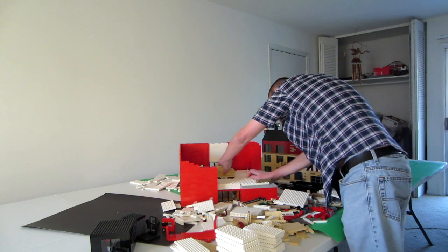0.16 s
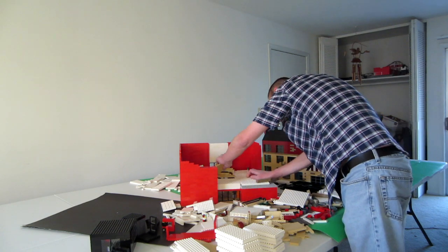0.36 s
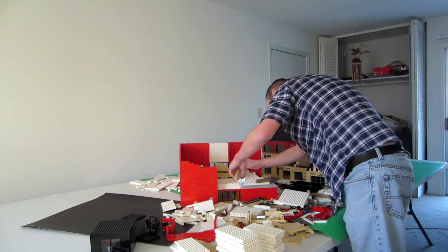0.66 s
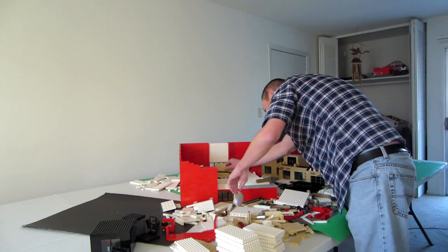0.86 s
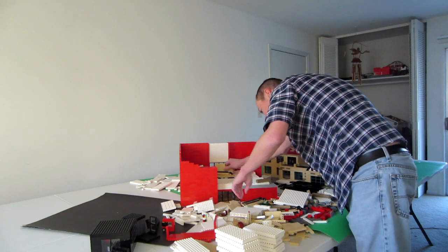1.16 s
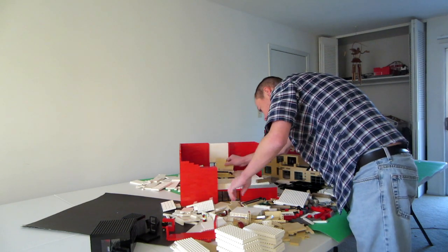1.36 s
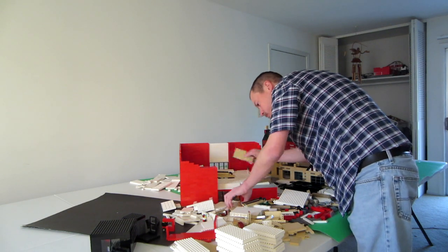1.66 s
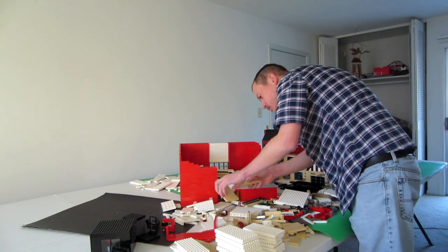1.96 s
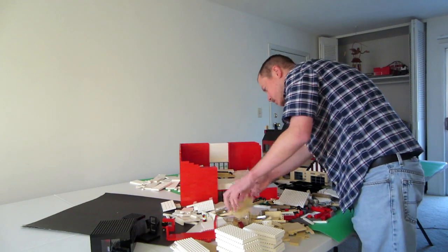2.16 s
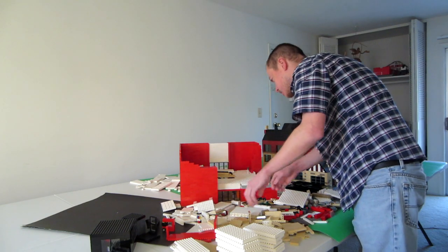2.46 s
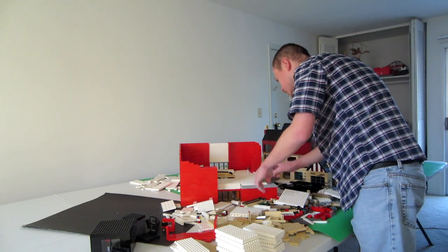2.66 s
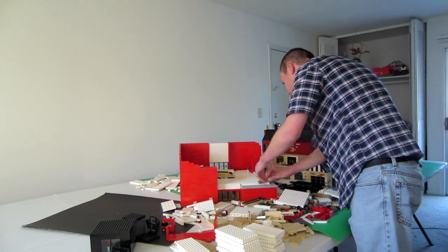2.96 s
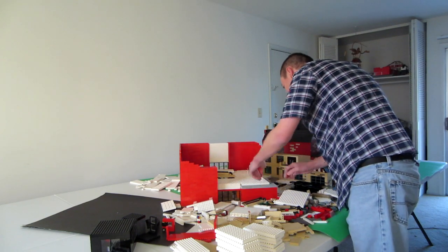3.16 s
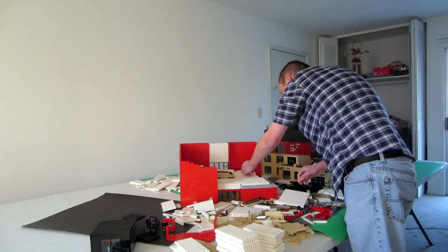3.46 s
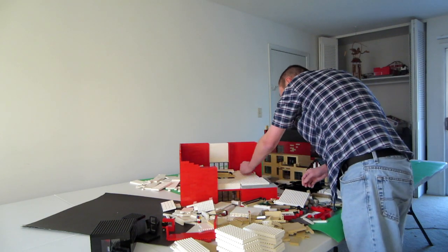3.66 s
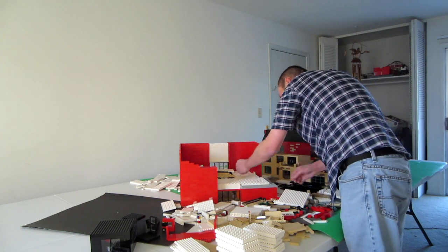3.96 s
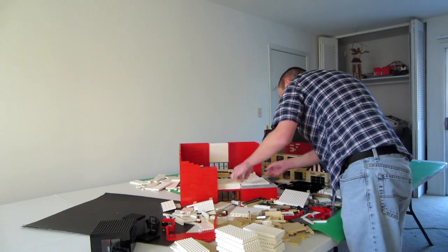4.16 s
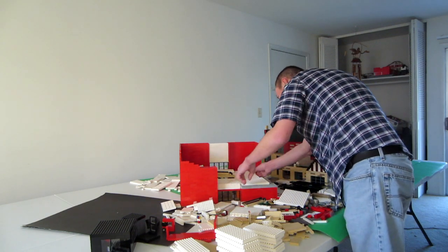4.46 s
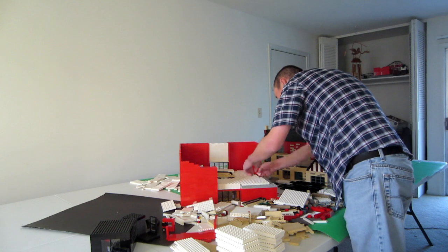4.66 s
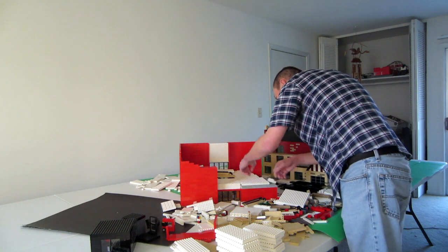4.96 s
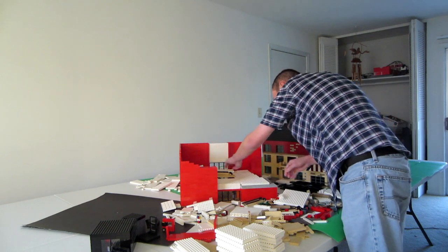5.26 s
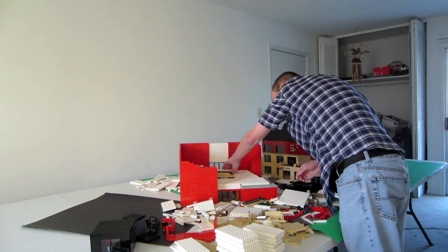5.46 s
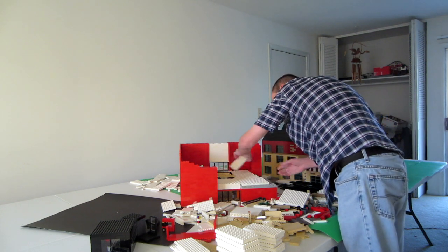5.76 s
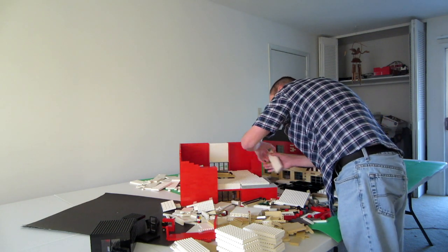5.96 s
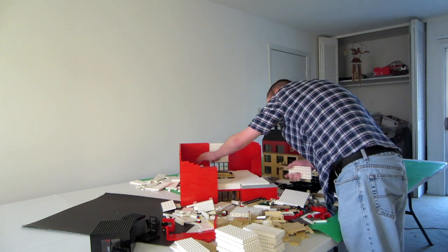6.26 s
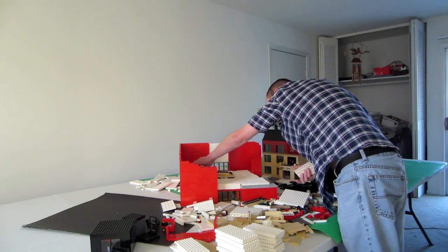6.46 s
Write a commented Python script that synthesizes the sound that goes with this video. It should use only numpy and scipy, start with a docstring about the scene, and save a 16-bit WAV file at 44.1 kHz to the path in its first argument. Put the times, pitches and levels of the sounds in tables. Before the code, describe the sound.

Irregular plastic clatter of toy bricks being pried off and dropped on loose piles, a short tumbling cascade, and soft room hush beneath.

```python
"""Under a steady room hush, plastic toy bricks are pried off a model and dropped on heaps of bricks on a table.
Each contact chatters into damped modes, coloured by table resonances; decaying sines thump the table top. Then
loose bricks slide (scattered tiny touches), freed pieces ring (clusters of close sines) and a section tumbles
down a heap (uneven knocks); later a wide plate is knocked and rings in fixed modes, with further clusters of
close sines near its pitches. The bare room answers the contacts, slide, rings and plate with near reflections
and a diffuse tail."""
import sys
import numpy as np
from scipy import signal
from scipy.fft import rfft, irfft
from scipy.io import wavfile

SR = 44100
rng = np.random.default_rng(int(sys.argv[2]) if len(sys.argv) > 2 else 0)


def unload_wav(signal):
    """Save mono or channel-first audio to the path in sys.argv[1] as 16-bit WAV at rate SR, clipped to [-1, 1]."""
    wavfile.write(
        sys.argv[1],
        SR,
        np.round(np.clip(np.atleast_2d(signal).T, -1, 1) * 32767).astype(np.int16),
    )


N = 291501
BLOW_S = .01   # blow levels state the rms if all energy fell within this time
CUTOFF_HZ = 16000
# band edges for room decay and blow colour: edge_hz
EDGES_HZ = np.r_[40, 60, 85, np.geomspace(113, 3620, 12),
            4700, 6200, 8000, 9500, 10900, 12400, 14200, 16500]
CENTRES_HZ = np.sqrt(EDGES_HZ[:-1] * EDGES_HZ[1:])
BANK = [signal.butter(3, pair, "band", fs=SR, output="sos") for pair in zip(EDGES_HZ, EDGES_HZ[1:])]
AGE = np.arange(SR // 2) / SR   # s since a blow


def from_db(db):
    """Decibels to amplitude gain."""
    return 10 ** (np.asarray(db) / 20)


def unit(x):
    """Scale to an energy of one."""
    return x / np.sqrt(np.sum(x ** 2, axis=-1, keepdims=True) + 1e-20)


def at_hz(points, hz, axis=1):
    """Interpolate a table column on a log-frequency axis."""
    points = np.array(points)
    return np.interp(np.log(hz), np.log(points[:, 0]), points[:, axis])


def fade(t60_s):
    """Exponential decay after a blow: 60 dB per t60."""
    return from_db(-60 * np.minimum(AGE / max(t60_s, 1e-3), 4))


def add(out, start_s, sound):
    """Mix a sound in at start_s."""
    start = round(start_s * SR)
    out[start:start + len(sound)] += sound[:N - start]


def hush():
    """Steady room air: Gaussian noise shaped in frequency, strongest in the bass."""
    # noise spectrum: frequency_hz, relative_density_db_per_hz
    spectrum_points = [(12, -36), (20, 0), (77, -9.5), (104, -11.5), (187, -12.5), (210, -12.5), (642, -16),
                       (698, -18.5), (897, -14.5), (1030, -18.5), (6720, -38.5), (11400, -49.5),
                       (12800, -56), (16000, -49)]
    rms_db = -53.5
    hz = np.maximum(np.arange(N // 2 + 1) * SR / N, 1)
    white = rfft(rng.standard_normal(N))
    noise = irfft(white * from_db(at_hz(spectrum_points, hz)), N)
    return from_db(rms_db) * unit(noise) * np.sqrt(N)


def echo_path(early_t60_s=0.079, early_db=7, reflections_per_s=4000, gap_s=0.0037, build_s=0.012):
    """Table spot to microphone: direct sound with sparse near reflections, and a tail decaying per band."""
    # room: frequency_hz, t60_s, relative_echo_db
    room = [(130, 0.47, -1.5), (394, 0.42, 1), (1460, 0.4, 2), (4970, 0.39, -3.5), (13000, 0.28, -5)]
    arrives = rng.random(len(AGE)) < reflections_per_s / SR * (1 - np.exp(-AGE / gap_s))
    reflections = rng.standard_normal(len(AGE)) * arrives * fade(early_t60_s)
    near = from_db(early_db) * unit(reflections)
    near[0] += 1   # direct sound
    build_up = 1 - np.exp(-AGE / build_s)
    tail = 0
    for sos, hz, width_hz in zip(BANK, CENTRES_HZ, np.diff(EDGES_HZ)):
        band = signal.sosfilt(sos, rng.standard_normal(len(AGE)))
        dying = band * fade(at_hz(room, hz)) * build_up
        tail = tail + unit(dying) * np.sqrt(2 * width_hz / SR) * from_db(at_hz(room, hz, axis=2))
    return unit(near), tail


def chatter(count=4, span_s=.012, bounce_db=-12, size=2000):
    """A first touch, then weaker random touches of corners and studs."""
    touches = np.zeros(size)
    at = np.clip(rng.random(count) * span_s * SR, 1, size - 1).astype(int)
    touches[at] = from_db(bounce_db) * rng.standard_normal(count)
    touches[0] = 1
    return touches


def piece(count=32, t60_at_2khz_s=0.014, crack_db=-2, size=2000):
    """Impulse response of a brick assembly: a crack plus damped modes, the higher dying sooner."""
    hz = np.exp(rng.uniform(np.log(600), np.log(10000), (count, 1)))
    t60_s = t60_at_2khz_s * (2000 / hz) ** .5
    modes = unit(np.sin(2 * np.pi * hz * AGE[:size]) * from_db(-60 * AGE[:size] / t60_s))
    strengths = np.sqrt(hz) * rng.standard_normal((count, 1))
    sound = unit(np.sum(modes * strengths, axis=0))
    sound[0] += from_db(crack_db)
    return sound


def voiced(blow, octave_db, size=32768):
    """Set a blow's levels per octave with a minimum-phase filter, keeping its attack sharp."""
    spectrum = rfft(blow, size)
    hz = np.maximum(np.arange(size // 2 + 1) * SR / size, 1)
    band_power = np.array([np.mean(np.abs(spectrum[(hz >= low) & (hz < high)]) ** 2)
                           for low, high in zip(EDGES_HZ, EDGES_HZ[1:])])
    # per octave to per Hz
    voiced_power = from_db(octave_db) ** 2 * BLOW_S * SR ** 2 / (2 * np.log(2) * CENTRES_HZ)
    log_gain = .5 * np.log(voiced_power / band_power)
    cepstrum = irfft(np.interp(np.log(hz), np.log(CENTRES_HZ), log_gain), size)
    cepstrum[1:size // 2] *= 2   # folded forward in time: the filter is causal
    minimum_phase = np.exp(rfft(cepstrum[:size // 2], size))
    return irfft(spectrum * minimum_phase, size)[:len(AGE)]


def heard(sound, path, size=8192):
    """The near field keeps a piece's fine modes; the tail gathers it from all sides, so is smooth."""
    near, tail = path
    reflected = signal.fftconvolve(sound, near[:size // 2])
    close = voiced(reflected, 10 * np.log10(CENTRES_HZ), size=size)   # equal energy per Hz
    return np.pad(unit(close), (0, len(AGE) - size)) + tail


def blow_colour(strength_db, weight_db, hardness_db):
    """Levels per octave: weight sets the thud, hardness the tick, their balance knock against clack."""
    # zones of thud, knock, clack, tick: centre_hz
    zones_hz = [200, 650, 2100, 6000]
    # span of the top lift: start_hz, full_hz
    sharp_hz = [6000, 9500]
    # colour common to all contacts: frequency_hz, relative_level_db_per_octave
    common_colour = [(45, -37), (95, -27.5), (135, -5.5), (180, -4.5), (300, -1), (600, -2), (1200, 0),
                     (3000, 0.5), (4100, -1.5), (7000, 0), (8900, 1.5), (11600, -26), (13300, -21.5),
                     (15400, -29)]
    knock_db, knock_db_per_db = 0.2, 0.18
    sharp_db, sharp_db_per_db = 0.94, .07
    lean_db = knock_db + knock_db_per_db * (weight_db - hardness_db)
    levels_db = [weight_db, lean_db, -lean_db, hardness_db]
    zones_db = np.interp(np.log(CENTRES_HZ), np.log(zones_hz), levels_db)
    # a corner hits more briefly than a flat face
    top_db = np.interp(CENTRES_HZ, sharp_hz, [0, sharp_db + sharp_db_per_db * hardness_db])
    return strength_db + zones_db + top_db + at_hz(common_colour, CENTRES_HZ)


def contacts(paths):
    """Each contact, tumbling knocks included, chatters into a piece coloured by its manner."""
    # blows on table and heaps: start_s, relative_strength_db, weight_db (bass), hardness_db (treble)
    blows = [(.077, -41.5, -3, 1.5), (.121, -30, -2, -17.5), (.179, -17, -5.5, -13), (.547, -54, 11, -28),
             (.617, -44.5, 0.5, -12), (.772, -37, 2.5, -8.5), (.804, -40.5, 2, -22), (.8732, -15, 10, -14),
             (.971, -26.5, 10.5, -9.5), (1.0174, -25, 5, -1), (1.022, -21.5, 1.5, -6.5),
             (1.069, -31.5, 2, -4), (1.138, -33, -30, -11), (1.211, -25, 4.5, -15.5),
             (1.2945, -30.5, 3, -7), (1.364, -32.5, 6.5, -22), (1.556, -27.5, 1.5, -10.5),
             (1.593, -28.5, 1, -7), (1.692, -34.5, 0.5, -16.5), (1.767, -33.5, -12, -19.5),
             (1.821, -25, -7.5, -21), (2.169, -22.5, 14.5, -6.5), (2.203, -22.5, 4, -7),
             (2.2418, -18.5, -2, -3.5), (2.289, -19.5, -1, 2.5), (2.754, -22, -18.5, -11.5),
             (2.865, -28.5, -9, -18), (2.902, -27.5, -7, -8), (3.2079, -20.5, -19.5, -4),
             (3.229, -30.5, 1.5, -3), (3.304, -29.5, -16, -9.5), (3.393, -35.5, -37, -16.5),
             (3.4385, -36.5, 8, 6.5), (3.4497, -26.5, 0.5, -3.5), (3.736, -45, -1, -7),
             (3.789, -42, 5, -6.5), (4.307, -29.5, 8.5, -7), (4.398, -44.5, 0, 11.5), (4.43, -41, 7.5, -24),
             (4.463, -38, -9, 5), (4.522, -36, -8, -2), (4.555, -29.5, 2.5, -7.5), (4.852, -51.5, 3, -12),
             (4.946, -45, -11, -22), (5.0101, -24, -10.5, -4), (5.1443, -25.5, -23.5, -18),
             (5.162, -27, -14.5, 0), (5.1668, -29.5, -22, -0.5), (5.257, -31.5, -6.5, -6),
             (5.299, -22.5, -25, -7.5), (5.414, -29, -10, -4.5), (5.436, -34.5, 3.5, -7),
             (5.522, -33, 2.5, -2.5), (5.638, -28.5, -2, -20.5), (5.702, -20, -7, -23),
             (5.761, -29.5, 3, -8.5), (5.769, -24.5, 3, -20), (5.804, -32, -19, -8.5),
             (6.02, -62.5, -14, 4), (6.371, -33, 9, -9), (6.38, -31, -3, -13), (6.424, -26.5, -0.5, -12),
             (6.472, -34, 7, -32), (6.551, -40, 3, -19)]
    own_colour_db = 1.17   # standard deviation of each piece's humps and dips
    out = np.zeros(N)
    for k, (start_s, *manner) in enumerate([*blows, *tumble()]):
        own_db = own_colour_db * rng.standard_normal(len(CENTRES_HZ))
        blow = heard(signal.fftconvolve(chatter(), piece()), paths[k % len(paths)])
        add(out, start_s, voiced(blow, blow_colour(*manner) + own_db))
    return out


def table_top(x):
    """Table and hollow model favour the same pitches at every contact: peak filters in series."""
    # resonances: frequency_hz, width_hz, gain_db
    resonances = [(209.6, 15, 2), (282.7, 5, 10), (411.4, 25.6, 7), (587, 2.7, 4.5), (872, 44, 4.5),
                  (1120, 14, 3), (1532, 16, 4.5), (2670, 100, 0), (4800, 54, -3), (8600, 2100, -5)]
    for hz, width_hz, gain_db in resonances:
        peak = signal.lfilter(*signal.iirpeak(hz, hz / width_hz, fs=SR), x)
        x = x + (from_db(gain_db) - 1) * peak
    return x


def thumps(lowest_hz=115):
    """A heavy landing swings the board as a decaying sine; a high-pass, as of the microphone, thins deep bass."""
    # landings: start_s, pitch_hz, amplitude_db (before decay and high-pass), t60_s
    landings = [(0.8724, 201, 0.5, 0.025), (2.169, 164, -9.5, 0.074), (4.307, 278, -30, 0.21),
                (5.769, 285, -20.5, 0.14)]
    out = np.zeros(N)
    for start_s, hz, amplitude_db, t60_s in landings:
        add(out, start_s, from_db(amplitude_db) * np.sin(2 * np.pi * hz * AGE) * fade(t60_s))
    high_pass = signal.butter(4, lowest_hz, "high", fs=SR, output="sos")
    return signal.sosfilt(high_pass, out + 1e-18)


def slide(paths, spread_db=6):
    """Loose bricks slide down the heap: many tiny random collisions at scattered spots."""
    # course of the slide: time_s, touches_per_s, level_db (before band-pass)
    course = [(2.202, 99, -46), (2.25, 310, -30), (2.31, 530, -31), (2.47, 370, -37.5), (2.6, 120, -68),
              (2.7, 44, -70)]
    # pass band: low_hz, high_hz
    band_hz = [1300, 8500]
    s, per_s, level_db = np.transpose(course)
    t = np.arange(round(s[0] * SR), round(s[-1] * SR)) / SR
    rate = np.interp(t, s, per_s) / SR   # touches per sample
    spread = from_db(spread_db * np.clip(rng.standard_normal(len(t)), -2, 2))
    sizes = unit(spread) * np.sqrt(len(t) / rate)
    touches = (rng.random(len(t)) < rate) * sizes * from_db(np.interp(t, s, level_db))
    spot = rng.integers(0, len(paths), len(t))
    rattle = sum(signal.fftconvolve(touches * (spot == k), unit(heard(piece(), path)))
                 for k, path in enumerate(paths))
    band_pass = signal.butter(3, band_hz, "band", fs=SR, output="sos")
    out = np.zeros(N)
    add(out, s[0], signal.sosfilt(band_pass, rattle))
    return out


def rung(tone, path, level_db, tail_db=-8):
    """A ringing tone through near path and tail, scaled to level_db over BLOW_S."""
    near, tail = (unit(signal.fftconvolve(tone, part)[:len(AGE)]) for part in path)
    return unit(near + from_db(tail_db) * tail) * from_db(level_db) * np.sqrt(BLOW_S * SR)


def ring_clusters(paths, count=3, split=0.59):
    """Rings in clusters of close modes, the lower the longer: pieces bouncing clear, and further rings near the
    plate's pitches as it is struck."""
    # rings: start_s, centre_pitch_hz, relative_level_db
    rings = [(2.204, 3310, -29.5), (2.378, 2780, -22), (2.4125, 8600, -32), (2.576, 6510, -37),
             (2.866, 850, -29), (2.902, 856, -23), (3.2083, 1080, -30), (4.307, 531, -23.5),
             (4.3986, 2870, -37), (4.4632, 2610, -28.5), (4.505, 2620, -35.5), (4.946, 1450, -39.5),
             (5.0102, 2770, -22.5), (5.0102, 834, -27), (5.1621, 8500, -28.5), (5.399, 7960, -44),
             (5.8043, 3580, -27), (5.8043, 3000, -32)]
    ring_cycles = 65   # swings per 60 dB of decay
    out = np.zeros(N)
    for k, (start_s, hz, level_db) in enumerate(rings):
        t60_s = ring_cycles / hz
        modes_hz = hz + split / t60_s * rng.standard_normal((count, 1))
        tone = np.sum(np.sin(2 * np.pi * modes_hz * AGE), axis=0) * fade(t60_s)
        add(out, start_s, rung(tone, paths[k % len(paths)], level_db))
    return out


def tumble():
    """Contact rows for a section knocking its way down the heap at an uneven pace."""
    # course of the tumble: time_s, relative_strength_db, weight_db, hardness_db
    course = [(2.268, -24, 1.5, -4.5), (2.45, -22.5, -5.5, -5), (2.58, -25, -5.5, -17.5),
              (2.69, -34, -26, -29)]
    gap_s, jitter_s = .037, .004
    s, *columns = np.transpose(course)
    times = np.arange(s[0], s[-1], gap_s)
    times = times + jitter_s * rng.uniform(-1, 1, size=len(times))
    return np.column_stack([times] + [np.interp(times, s, column) for column in columns])


def plate(paths, vary_db=1.0):
    """A wide thin plate rings in the same modes at every blow; mode strengths vary with the struck spot."""
    # plate modes: frequency_hz, relative_level_db
    modes = [(797, 6), (867, -8), (1090, 2), (1435, 1), (1707, -9), (1863, -7), (2070, -11), (2270, -7),
             (2720, -5)]
    # blows: start_s, relative_level_db
    hits = [(3.2083, -22), (5.0102, -30.5), (5.1668, -17.5), (5.2993, -25.5)]
    t60_s = 0.17
    out = np.zeros(N)
    hz, modes_db = np.transpose(modes)
    for k, (start_s, level_db) in enumerate(hits):
        strengths = from_db(modes_db + vary_db * rng.standard_normal(len(hz)))
        tone = strengths @ np.sin(2 * np.pi * hz[:, None] * AGE) * fade(t60_s)
        add(out, start_s, rung(tone, paths[k % len(paths)], level_db))
    return out


def scene(count=16, contacts_db=-1.82, rings_db=-1):
    """Mix bricks landing at several spots, thumps, slide and hush."""
    paths = [echo_path() for spot in range(count)]
    knocks = from_db(contacts_db) * table_top(contacts(paths))
    ringing = from_db(rings_db) * (ring_clusters(paths) + plate(paths))
    return (knocks + ringing + thumps() + slide(paths) + hush())[None]


def record(dry):
    """Clip at full scale, then cut the top with a steep low-pass."""
    low_pass = signal.ellip(10, .1, 80, CUTOFF_HZ, fs=SR, output="sos")
    return signal.sosfilt(low_pass, np.clip(dry, -1, 1))


dry = scene()
out = record(dry)
unload_wav(out)
```